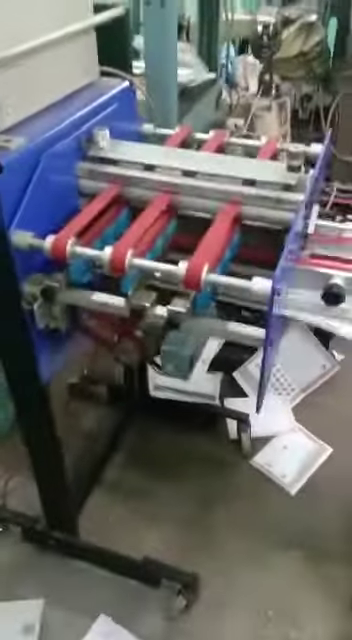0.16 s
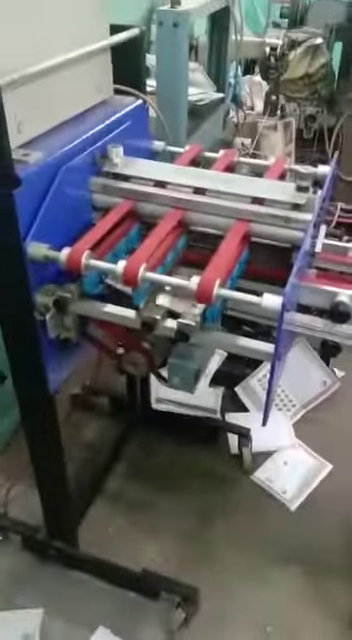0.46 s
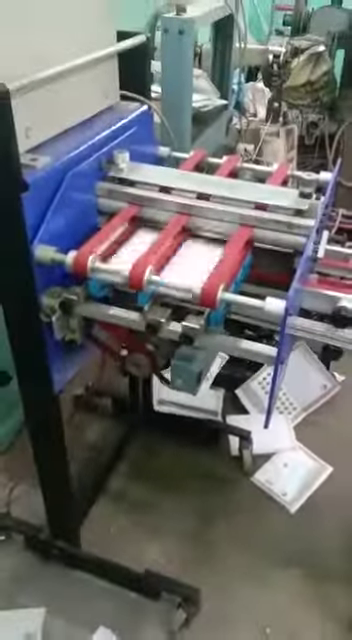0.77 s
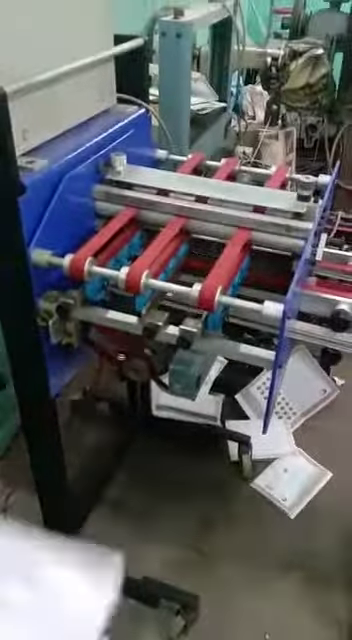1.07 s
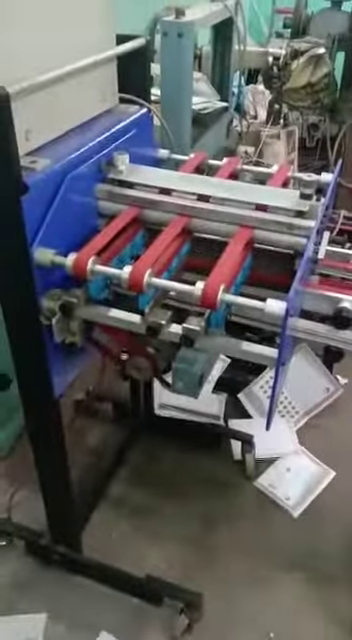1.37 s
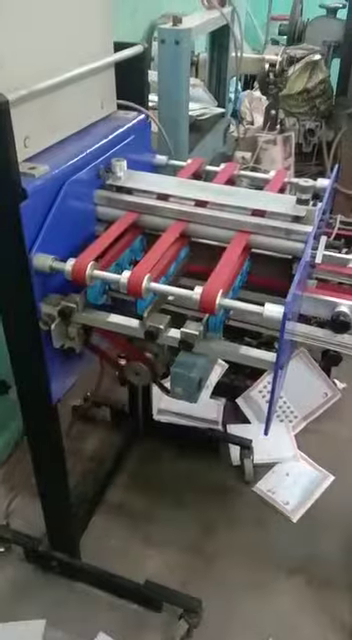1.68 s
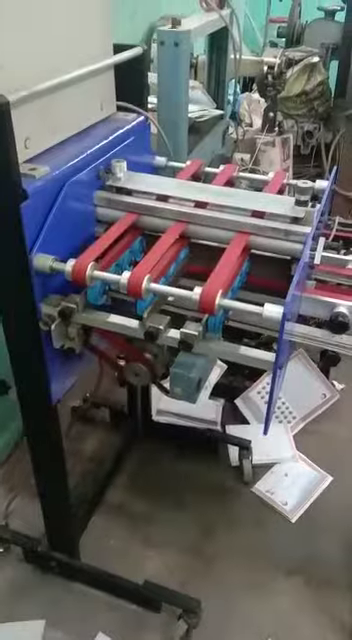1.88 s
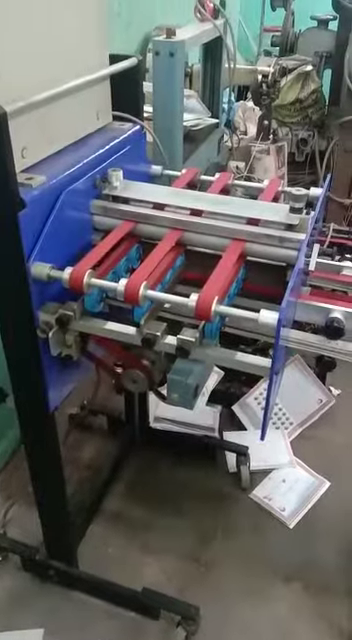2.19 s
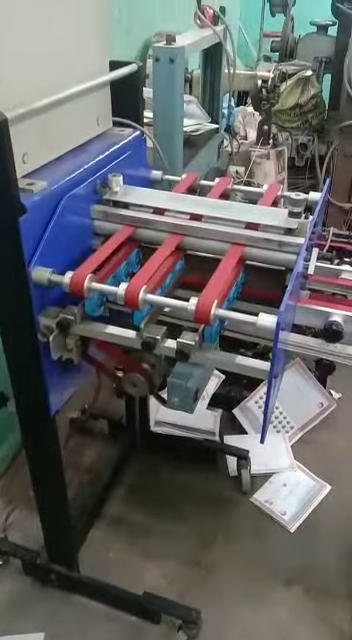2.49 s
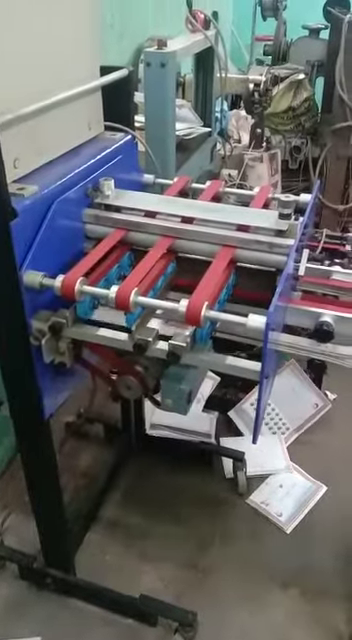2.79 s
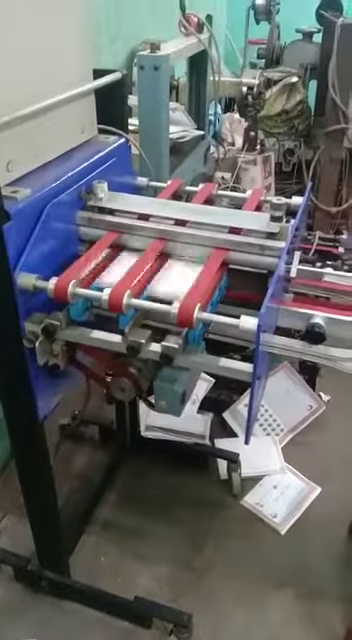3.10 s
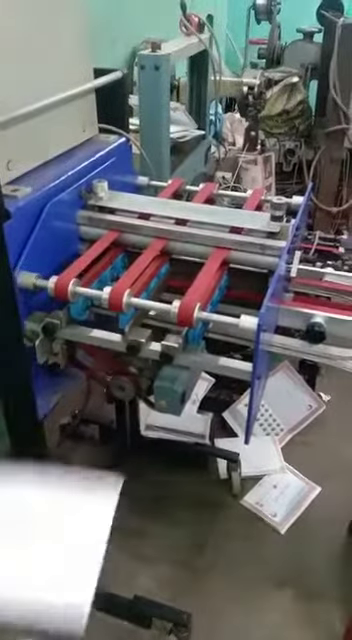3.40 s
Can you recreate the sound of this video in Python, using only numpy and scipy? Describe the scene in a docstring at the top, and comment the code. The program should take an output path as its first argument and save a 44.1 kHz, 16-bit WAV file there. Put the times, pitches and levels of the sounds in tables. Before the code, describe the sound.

A paper folding machine chatters steadily while sheets rasp through and clack sharply in a workshop.

```python
"""A belt-driven paper folding machine runs in a small workshop, a step away from a mono phone microphone.
Throughout, trains of random impacts excite gears and frame, over hum lines, low rumble and a bearing whine.
Sheets rasp through the rollers as coloured crackle; two, 2.4 s apart, trip a latch of decaying metal modes.
Noise bursts clack the fold plate; the first sheet buckles in resonant snaps, then a belt squeals. Brief gliding
tones are slipping belts and paper; decaying noise gives the room's echo."""
import sys
import numpy as np
from scipy import signal
from scipy.fft import rfft, irfft
from scipy.io import wavfile
from scipy.ndimage import uniform_filter1d, map_coordinates

SR = 44100
rng = np.random.default_rng(int(sys.argv[2]) if len(sys.argv) > 2 else 0)


def unload_audio(sound):
    """Save the sound as a 16-bit wav file, at the path given as the first command line argument."""
    columns = np.transpose(np.atleast_2d(sound))
    # keep every value between -1 and 1, then stretch to whole-number steps
    steps = np.round(np.clip(columns, -1, 1) * 32767)
    wavfile.write(sys.argv[1], SR, steps.astype(np.int16))


N = 156114


def undb(db):
    """Amplitude gain is the antilogarithm of a level in decibels."""
    return 10 ** (np.asarray(db) / 20)


def unit(x):
    """Normalise mean power: scale to rms 1."""
    return x / np.sqrt(np.mean(x ** 2))


def walk(rate):
    """Low-pass random modulation: levels held 1 / rate seconds, smoothed twice, scaled to rms 1."""
    hold = int(SR / rate)
    held = rng.standard_normal(N)[np.arange(N) // hold]
    return unit(uniform_filter1d(uniform_filter1d(held, hold), hold))


def clicks(rate, spread_db):
    """Shot noise: random contacts, rate per second on average, of either sign and uneven size."""
    happens = rng.random(N) < rate / SR
    sign = rng.choice([-1, 1], N)
    size = undb(spread_db * np.clip(rng.standard_normal(N), -2, 2))
    return unit(happens * sign * size)


def colour(x, points):
    """Minimum-phase filtering through (Hz, dB) points, keeping the power of white noise."""
    hz, db = np.array(points).T
    size = 4096
    bins_hz = np.arange(size // 2 + 1) * SR / size
    gain = undb(np.interp(np.log(bins_hz + 1), np.log(hz), db))
    # folding the cepstrum onto positive time makes the filter causal
    cepstrum = irfft(np.log(gain))
    cepstrum[1:size // 2] *= 2
    cepstrum[size // 2 + 1:] = 0
    response = irfft(np.exp(rfft(cepstrum)))
    return signal.fftconvolve(x, response / np.linalg.norm(response))[:N]


def ring(x, hz, width_hz):
    """Band-pass resonance with steep sides, keeping the power of white noise."""
    band = [hz - width_hz / 2, hz + width_hz / 2]
    sos = signal.butter(2, band, "band", fs=SR, output="sos")
    return signal.sosfilt(sos, x) * np.sqrt(SR / 2 / width_hz)


def shelves(x, bass_db, treble_db):
    """Shelving equalisation: zero-phase bands below 1010 Hz and above 3500 Hz are raised or lowered."""
    low = signal.sosfiltfilt(signal.butter(2, 1010, fs=SR, output="sos"), x)
    high = signal.sosfiltfilt(signal.butter(2, 3500, "high", fs=SR, output="sos"), x)
    return x + (undb(bass_db) - 1) * low + (undb(treble_db) - 1) * high


def envelope(t, attack, hold, release):
    """Transient amplitude: linear rise over attack, exponential fall from time hold onwards."""
    return np.clip(t / attack, 0, 1) * np.exp(-np.maximum(t - hold, 0) / release)


def drift(x, depth, rate):
    """Frequency modulation by uneven time: all frequencies wander by a relative rms depth."""
    return map_coordinates(x, [np.cumsum(1 + depth * walk(rate))], mode="mirror")


def running_gear(t):
    """Impact excitation: gear chatter, throbbing with each roller turn, rattles and rings the frame."""
    # Spectrum of the rattle. Each row: frequency in Hz, relative level in dB per Hz.
    gear_colour = [(30, -39), (60, -25.5), (120, -25.5), (250, -17.5), (420, -15.5), (540, -8.5), (970, -6),
                   (1250, -4), (2240, -8), (3100, -6.5), (3650, -19.5), (4950, -18.5), (5600, -15.5),
                   (6100, -25), (7100, -27.5), (8000, -45), (9200, -47), (13500, -44.5), (15300, -50)]
    # Resonances of frame and rollers. Each row: frequency in Hz, width in Hz, level in dB, flutter in dB.
    frame_modes = [(547.5, 41, -43.5, 2), (694.8, 19, -46, -2), (800.3, 31, -49.5, 1),
                   (1185, 102, -38.5, 1.5), (1261, 95, -30.5, 3), (2248, 96, -42, 1.5),
                   (2938, 26, -42.5, 5.5), (3100, 38, -46.5, 5.5), (4220, 70, -48, 7)]
    roller_hz, roller_depth = 24.2, 0.026
    turn_phase = 2 * np.pi * np.cumsum(roller_hz * (1 + 0.0064 * walk(2.94))) / SR
    turn = 1 + roller_depth * np.cos(turn_phase)

    def chatter():
        """Shot noise of tooth contacts, amplitude-modulated by the roller turn."""
        return clicks(3000, spread_db=3) * turn

    bass_churn_db = 2.5 * walk(14)
    rattle = undb(-30) * shelves(colour(chatter(), gear_colour), bass_churn_db, 0)
    frame = 0
    for hz, width, db, flutter_db in frame_modes:
        mode = ring(chatter(), hz, width) * undb(flutter_db * walk(110))
        frame = frame + undb(db) * unit(mode)
    return rattle + drift(frame, 0.00911, 25)


def bearing(t):
    """Narrow-band noise: a dry bearing's high whine comes in uneven beads and now and then flares."""
    # Bands of the whine. Each row: frequency in Hz, width in Hz, level before beads and flares in dB.
    whine_bands = [(5579, 150, -38.5), (5740, 120, -47.5), (9120, 170, -71)]
    # Moments of flaring. Each row: middle in seconds, gain in dB.
    flare_times = [(.372, 9), (.481, 12.5), (1.015, 10), (1.124, 13), (1.356, 6), (1.941, 10.5),
                   (2.091, 10), (3.251, 13.5)]
    flare_s = 0.0076  # standard deviation of the bell-shaped flare
    whine = sum(undb(db) * unit(ring(rng.standard_normal(N), hz, width)) for hz, width, db in whine_bands)
    flares = sum(undb(db) * np.exp(-.5 * ((t - middle) / flare_s) ** 2) for middle, db in flare_times)
    beads = unit(undb(3 * walk(60)))
    return drift(whine, 0.0072, 40) * np.hypot(beads, flares)


def motor(t):
    """Additive synthesis: hum lines wavering in level and pitch over a rumble of coloured shot noise."""
    # Hum lines. Each row: mean frequency in Hz, rms level before wavering in dB.
    hum_lines = [(72, -61), (97, -60.5), (124.5, -58)]
    # Course of the rumble. Each row: time in seconds, level in dB before a 1 dB lift.
    rumble_course = [(0.0, -34.5), (0.1, -61), (0.4, -49), (0.44, -28.5), (0.58, -68), (0.64, -32.5),
                     (0.9, -51), (1.65, -58), (1.88, -44), (2.1, -54), (2.83, -39), (2.95, -60),
                     (3.04, -35.5), (3.33, -48.5), (3.54, -37.5)]
    # Spectrum of the rumble. Each row: frequency in Hz, relative level in dB per Hz.
    rumble_colour = [(30, -49), (95, -8.5), (125, 2), (190, -5), (300, -1), (500, -12), (900, -15),
                     (3000, -62)]
    hum = 0
    for hz, db in hum_lines:
        level = undb(db + 7.7 * walk(12.96))
        phase = 2 * np.pi * np.cumsum(hz * (1 + 0.0223 * walk(13))) / SR
        hum = hum + level * np.sqrt(2) * np.sin(phase)
    rumble_db = 1 + np.interp(t, *np.array(rumble_course).T)
    return hum + undb(rumble_db) * colour(clicks(600, spread_db=0.8), rumble_colour)


def sheets(t):
    """Friction as shot noise: gripped paper crackles and rasps, its resonances drifting as it bends."""
    # Spectrum of the paper. Each row: frequency in Hz, relative level in dB per Hz.
    paper_colour = [(60, -50), (130, -19.5), (400, -3), (900, -8.5), (1250, 6.5), (1700, -9), (2850, 7),
                    (3900, -6), (5500, -4), (7200, -14.5), (8200, -27.5), (11500, -32.5), (13800, -38),
                    (15200, -29)]
    # Rubbing on rollers and guides. Each row: start in seconds, hold in seconds,
    # level before the shelves in dB, bass shelf in dB, treble shelf in dB, release in seconds.
    rasp_times = [(-0.01, 0.037, -19.5, -6.5, 1, 0.034), (0.215, 0.14, -30.5, 6.5, -2, 0.046),
                  (0.393, 0.049, -18, 3, -2, 0.032), (0.451, 0.24, -28, -21, 7, 0.041),
                  (0.61, 0.051, -17, -2.5, -21, 0.027), (0.663, 0.061, -20, 0.5, 2.5, 0.087),
                  (1.418, 0.028, -24.5, 3, -12, 0.1), (1.618, 0.026, -22, 0.5, 4, 0.028),
                  (2.411, 0.028, -22, -30, 10.5, 0.055), (2.603, 0.014, -28.5, 6.5, 2, 0.036),
                  (2.7, 0.047, -28.5, -22, 2.5, 0.1), (2.802, 0.026, -19.5, -1, 4, 0.082),
                  (2.841, 0.033, -19, -13, -7, 0.028), (3.003, 0.021, -29, 15, 5, .02),
                  (3.029, 0.032, -20.5, 8, 3.5, 0.057), (3.101, 0.018, -31, 14, 12, 0.098),
                  (3.233, 0.019, -23.5, 4, 4.5, 0.035)]
    crackle = drift(colour(clicks(3000, spread_db=0), paper_colour), 0.04, 50)
    rasps = 0
    for start, hold, db, bass_db, treble_db, release in rasp_times:
        stretch = np.roll(crackle, rng.integers(N))  # each rasp takes its own stretch of crackle
        rasp = shelves(stretch, bass_db, treble_db) * envelope(t - start, 0.009, hold, release)
        rasps = rasps + undb(db) * rasp
    return rasps


def squeaks(t):
    """Stick-slip tones: slipping belts and paper chirp and groan with gliding, wavering pitch."""
    # Each row: middle in seconds, frequency there before wavering in Hz, peak level in dB,
    # length (standard deviation) in seconds, relative glide per second.
    squeak_times = [(0.04, 119, -39.5, .03, 0.29), (1.115, 9050, -36, 0.0024, 0),
                    (1.64, 11400, -49, 0.013, 0), (2.377, 2360, -27, 0.0098, 0.55),
                    (3.387, 651, -32.5, 0.099, -0.81), (3.264, 168, -34.5, 0.034, -0.75),
                    (3.445, 141.3, -41, 0.074, -0.41)]
    waver = 1 + 0.0062 * walk(140)
    out = 0
    for middle, hz, db, length, glide in squeak_times:
        bell = np.exp(-.5 * ((t - middle) / length) ** 2)
        phase = 2 * np.pi * np.cumsum(hz * (waver + glide * (t - middle))) / SR
        out = out + undb(db) * bell * np.sin(phase)
    return out


def latch(t):
    """Modal synthesis: decaying metal modes tick and briefly buzz as the sheet arrives."""
    # Trips of the latch. Each row: start in seconds, level in dB.
    latch_trips = [(.5788, -10.5), (2.9716, -12.5)]
    # Modes of the latch. Each row: frequency in Hz, decay in seconds, relative level in dB.
    latch_modes = [(2520, .004, -3), (2800, .003, -6), (3300, .002, -7), (3750, .0025, -5),
                   (4380, .0035, -1), (4720, .002, -7)]
    attack_s, buzz_decay_s = 0.0016, 0.028
    out = 0
    for hz, decay, mode_db in latch_modes:
        buzz = undb(-19) * ring(rng.standard_normal(N), hz, width_hz=600)
        for start, db in latch_trips:
            since = t - start
            tick = np.sin(2 * np.pi * hz * since) * envelope(since, attack_s, attack_s, decay)
            buzzing = buzz * envelope(since, attack_s, 0, buzz_decay_s)
            out = out + undb(db + mode_db) * (tick + buzzing)
    return out


def clacks(t):
    """Impulse and noise through a filter: a hard crack, then the fold plate rattles for milliseconds."""
    # Fold plate and stops. Each row: start in seconds, level before the shelves in dB,
    # bass shelf in dB, treble shelf in dB, decay in seconds.
    clack_times = [(.633, -15, 1, -1, 0.011), (0.653, -16.5, 2, -1, 0.0057), (1.1093, -22, -3, -9, 0.0086),
                   (1.114, -22.5, 2.5, 12.5, 0.015), (1.123, -18, 3, -6, 0.018), (1.424, -18, 6, -8, 0.011),
                   (3.0256, -8.5, -7, -20, 0.0077), (3.0458, -13.5, -9, -4, 0.011),
                   (3.1008, -9, -8, 1.5, 0.011), (3.484, -9.5, -21, -6, 0.0044),
                   (3.487, -18, -10, 11.5, 0.031)]
    # Spectrum of the plate. Each row: frequency in Hz, relative level in dB per Hz.
    plate_colour = [(60, -71), (150, -14), (500, -0.5), (1250, 7.5), (1900, -0.5), (3000, -2), (4200, -10),
                    (7000, -13), (8500, -29.5), (13500, -34.5), (15200, -30)]
    blows = 0
    for start, db, bass_db, treble_db, decay in clack_times:
        push = rng.standard_normal(N) * envelope(t - start, .0005, .001, decay)
        push[int(start * SR)] += undb(17.5)  # first contact, one sample
        blows = blows + undb(db) * shelves(push, bass_db, treble_db)
    return colour(blows, plate_colour)


def buckle(t):
    """Resonators excited by shot noise: separate creases snap in the bending sheet."""
    # Times in seconds: start, hold, attack, release.
    buckle_times = (.672, 0.041, .02, 0.021)
    # Resonances of the sheet. Each row: frequency in Hz, width in Hz, level in dB.
    buckle_modes = [(2420, 530, -18), (2740, 450, -21), (4220, 2600, -29.5)]
    start, hold, attack, release = buckle_times
    creases = clicks(600, spread_db=0.5)
    snaps = sum(undb(db) * ring(creases, hz, width) for hz, width, db in buckle_modes)
    return envelope(t - start, attack, hold, release) * snaps


def squeal(t):
    """Stick-slip: a belt slips and squeals after the first sheet, giving a rough note of rising pitch."""
    # Times in seconds: start, hold, attack, release.
    squeal_times = (0.79, 0.25, 0.14, 0.008)
    # Partials before the rise. Each row: frequency in Hz, width in Hz, level in dB.
    squeal_partials = [(2925, 200, -26), (5640, 160, -35.5), (5870, 1300, -36), (9100, 590, -57)]
    start, hold, attack, release = squeal_times
    rise_per_s = 0.28  # relative rise of the pitch
    note = sum(undb(db) * unit(ring(clicks(3000, 4.3), hz, width)) for hz, width, db in squeal_partials)
    catches = unit(undb(0.5 * walk(120)))
    note = drift(note, 0.013, 70) * catches
    # reading the note ever faster raises its pitch
    clock = t + rise_per_s * (t - start - hold / 2) ** 2 / 2
    rising = map_coordinates(note, [clock * SR], mode="mirror")
    return envelope(t - start, attack, hold, release) * rising


def workshop(x, t):
    """Diffuse reverberation: decaying noise stands for the walls' echo, quicker to fade in the treble."""
    echo_db, t60_s, treble_t60_s = -8, 0.57, 0.24
    noise = rng.standard_normal(N)
    low = signal.sosfilt(signal.butter(1, 3000, fs=SR, output="sos"), noise)
    low_tail = low * np.exp(-np.log(1000) * t / t60_s)
    high_tail = (noise - low) * np.exp(-np.log(1000) * t / treble_t60_s)
    tail = (low_tail + high_tail) * np.clip(t / 0.01, 0, 1)
    echo = signal.fftconvolve(x, tail / np.linalg.norm(tail))[:N]
    return (x + undb(echo_db) * echo) / np.hypot(1, undb(echo_db))


def scene():
    """Superposition: the machine in its room plus the dry motor, the same in both channels."""
    t = np.arange(N) / SR
    running = running_gear(t) + bearing(t)
    paper = sheets(t) + squeaks(t) + buckle(t) + squeal(t)
    contacts = latch(t) + clacks(t)
    mono = motor(t) + workshop(running + paper + contacts, t)
    return np.array([mono, mono])


def record(dry):
    """Linear filtering: the phone's microphone hollows two narrow treble bands and cuts the top."""
    # Hollows in the response. Each row: frequency in Hz, width in Hz.
    port_notches = [(6300, 250), (8150, 510)]
    depth, top_hz = 0.72, 15650
    for hz, width in port_notches:
        dry = dry - depth * signal.lfilter(*signal.iirpeak(hz, hz / width, fs=SR), dry)
    return signal.sosfilt(signal.ellip(10, .2, 80, top_hz, fs=SR, output="sos"), dry)


dry = scene()
out = record(dry)
unload_audio(out)
```